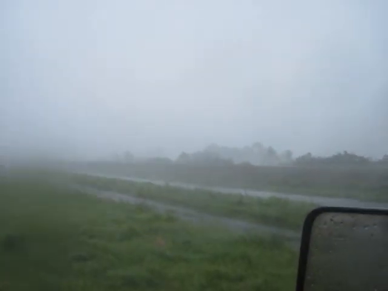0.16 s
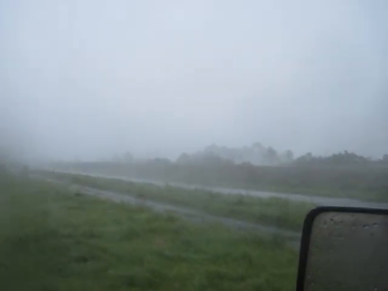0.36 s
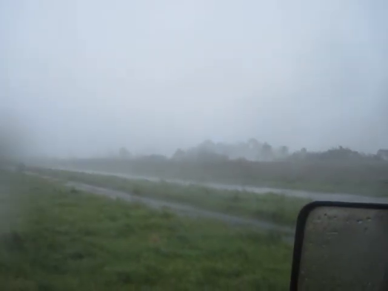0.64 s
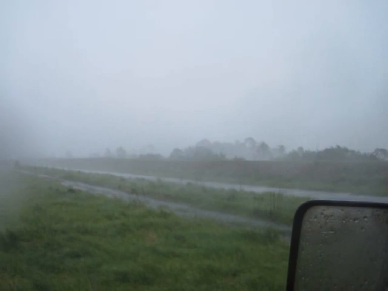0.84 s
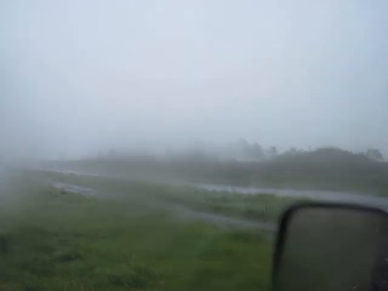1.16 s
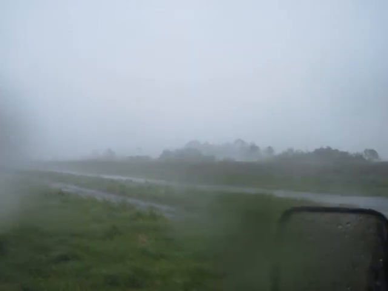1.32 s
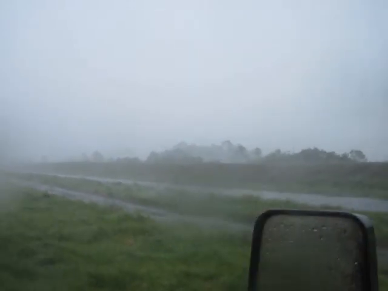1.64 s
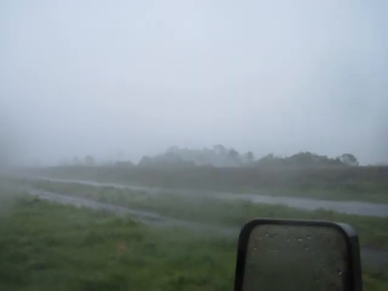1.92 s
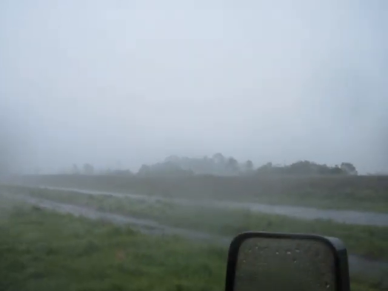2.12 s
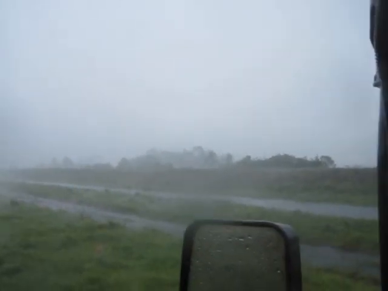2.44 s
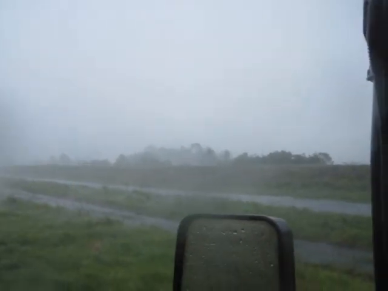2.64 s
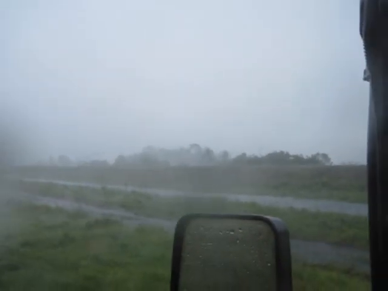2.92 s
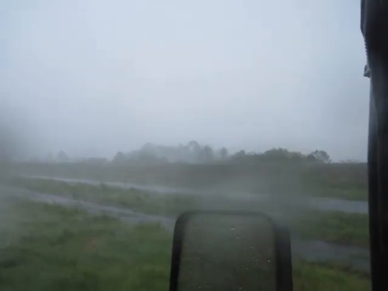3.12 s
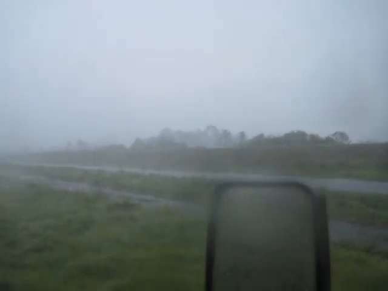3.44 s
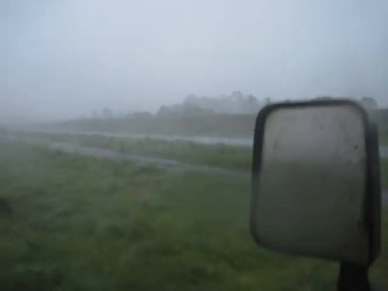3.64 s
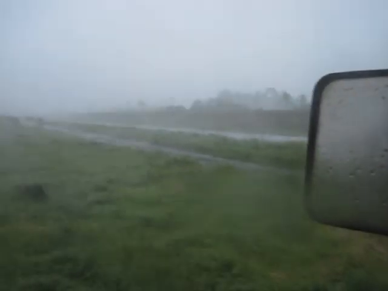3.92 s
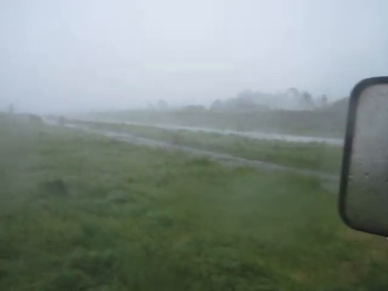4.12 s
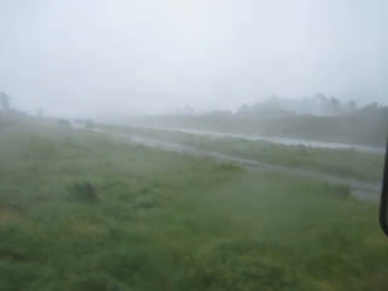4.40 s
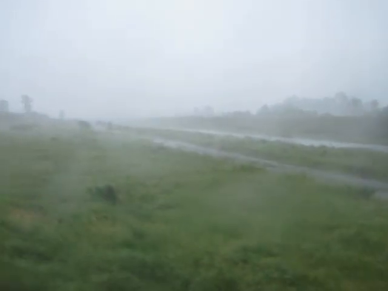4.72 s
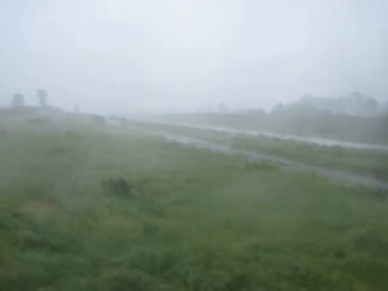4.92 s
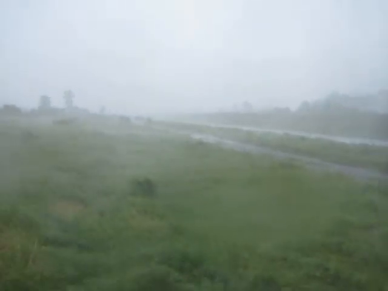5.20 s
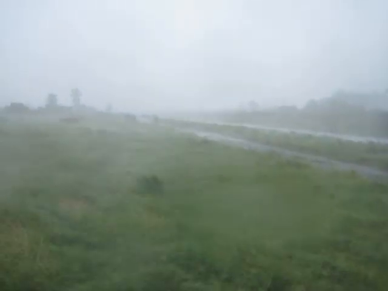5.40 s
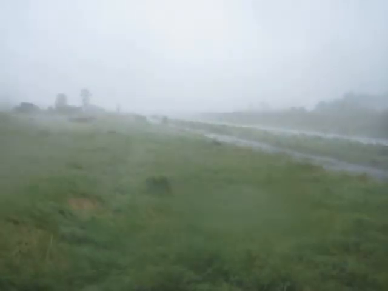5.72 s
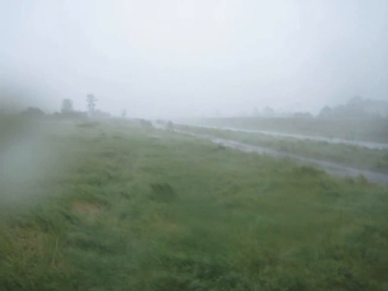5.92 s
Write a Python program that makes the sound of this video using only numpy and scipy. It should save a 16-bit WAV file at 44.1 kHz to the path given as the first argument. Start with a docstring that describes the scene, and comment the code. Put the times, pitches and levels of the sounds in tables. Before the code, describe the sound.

Wind gusts buffet a small camera at a vehicle's open window while raindrops tick sharply on its case and plop over its microphone.

```python
"""Rain drops, blown in through a vehicle's open window, tick on the case of a small camera: noise bursts plus case modes.
Some cap its microphone port and plop: trapped air rings, and the overload makes the gain control duck.
Gusts buffet the port and rush round the window frame: coloured, fluttering noise.
Behind them the downpour hisses as steady noise, and a fine spray crackles as many tiny drops."""
import sys
import numpy as np
from scipy import signal
from scipy.fft import rfft, irfft, next_fast_len
from scipy.io import wavfile
from scipy.ndimage import map_coordinates

SR = 44100
rng = np.random.default_rng(int(sys.argv[2]) if len(sys.argv) > 2 else 0)


def wav_record(signal):
    """Record a signal, one row per channel, as 16-bit PCM in the file named by sys.argv[1]."""
    frames = np.transpose(np.atleast_2d(signal))
    bounded = np.clip(frames, -1, 1)
    # unit amplitude maps onto the largest positive 16-bit level
    quanta = np.round(bounded * 32767).astype(np.int16)
    wavfile.write(sys.argv[1], SR, quanta)


N = 266839

# spectrum of wind rush and sloshing water: [f/Hz, relative level/dB]
RUSH_SPECTRUM = [(100, -14.5), (270, -7), (480, -2), (800, -2.5), (1100, -12), (1600, -21), (2400, -35.5),
                 (6000, -54)]


def amp(db):
    """Gain of a level in dB."""
    return 10 ** (np.asarray(db) / 20)


def unit(x):
    """Each row at rms 1."""
    return x / np.sqrt(np.mean(x ** 2, axis=-1, keepdims=True) + 1e-20)


def gain(points, hz):
    """Gain of (Hz, dB) points joined on a log frequency axis."""
    f, db = np.transpose(points)
    return amp(np.interp(np.log(hz + 1), np.log(f + 1), db))


def curve(rows):
    """One value per sample from (s, value) rows."""
    return np.interp(np.arange(N) / SR, *np.transpose(rows))


def wobble(knots_per_s):
    """Smooth random curve through normally distributed knots."""
    knots = rng.standard_normal(int(N * knots_per_s / SR) + 4)
    return map_coordinates(knots, [np.arange(N) * knots_per_s / SR])


def coloured(x, response):
    """Causal minimum-phase filter with a given gain over frequency, along the last axis."""
    n = x.shape[-1]
    m = 2 * next_fast_len(n)
    log_gain = np.log(np.maximum(response(np.fft.rfftfreq(m, 1 / SR)), 1e-6))
    cepstrum = irfft(log_gain, m)
    # folding the cepstrum makes the phase minimal
    cepstrum[..., 1:m // 2] *= 2
    cepstrum[..., m // 2 + 1:] = 0
    return irfft(rfft(x, m) * np.exp(rfft(cepstrum)), m)[..., :n]


def noise(spectrum, swell_db):
    """Noise of rms 1 that swells by swell_db before it takes its colour."""
    swelling = rng.standard_normal(N) * amp(swell_db)
    return unit(coloured(swelling, lambda hz: gain(spectrum, hz)))


def placed(times_s, sounds):
    """Each row of sounds laid down at its time."""
    start = np.round(np.abs(times_s) * SR).astype(int)[:, None]
    at = start + np.arange(sounds.shape[1])
    return np.bincount(at.ravel(), sounds.ravel(), N)[:N]


def puffs(spectrum, swell_db, patch_hz=400, depth_db=3):
    """Turbulent noise: each eddy also has its own colour, so neighbouring bands flutter apart."""
    x = noise(spectrum, swell_db)
    hz, _, z = signal.stft(x, SR, nperseg=512)
    frames = np.arange(z.shape[1])
    field = rng.standard_normal((int(hz[-1] / patch_hz) + 2, len(frames)))
    grid = np.meshgrid(hz / patch_hz, frames / 2, indexing="ij")
    patches = map_coordinates(field, grid, mode="nearest")
    _, fluttering = signal.istft(z * amp(depth_db * patches), SR, nperseg=512)
    return unit(fluttering[:N])


def wind(dull_hz=1150, bright_db=-13):
    """Gusts add power to steady wind; head-on eddies shake the port, grazing ones rush, brighter when strong."""
    # steady wind between gusts: [t/s, level/dB]
    steady_rows = [(0, -28.5), (1.05, -43), (1.5, -53.5), (1.9, -38), (2.3, -34.5), (2.8, -35.5),
                   (3.25, -19), (3.75, -35), (4.4, -30), (4.85, -28), (5.45, -29), (6.05, -20)]
    # angle of the wind: [t/s, rush round the frame re buffet on the port/dB]
    graze_rows = [(0, 10), (.95, 5.5), (1.6, 10), (2.0, -2.5), (2.42, -2.5), (3.1, 8.5), (4.02, 3),
                  (4.38, -6.5), (5.0, -.5), (6.05, -10)]
    # gusts: [t/s, level/dB]
    gust_rows = [(.068, -19), (.138, -17), (.228, -18), (.276, -19), (.5, -26), (.577, -20), (.64, -27),
                 (.93, -25), (.99, -27), (2.009, -12), (2.06, -18), (2.207, -18), (2.383, -15),
                 (2.409, -13), (2.439, -14), (2.485, -21), (2.588, -15), (2.645, -15), (2.668, -11),
                 (2.856, -17), (2.961, -16), (2.992, -19), (3.045, -12), (3.085, -12), (3.16, -17),
                 (3.208, -9), (3.24, -16), (3.3, -12.5), (3.335, -15), (3.363, -10), (3.394, -17),
                 (3.485, -19), (3.593, -20), (4.008, -20.5), (4.388, -17), (4.52, -18), (4.548, -17),
                 (4.63, -13), (4.98, -20), (5.015, -14), (5.05, -17), (5.175, -16), (5.285, -13),
                 (5.605, -21), (5.652, -20), (5.765, -10), (5.82, -20), (5.905, -17), (5.97, -17)]
    # spectrum of the buffet on the port: [f/Hz, relative level/dB]
    buffet_spectrum = [(15, -6), (75, 1.3), (190, 2), (380, -2), (700, -23.5), (2000, -49)]
    attack_s, hold_end_s, release_tau_s = 0.006, 0.016, 0.0115

    s, db = np.transpose(gust_rows)[:, :, None]
    t = np.arange(SR // 2) / SR
    rise = np.clip(t / attack_s, 0, 1)
    fall = np.exp(-np.maximum(t - hold_end_s, 0) / release_tau_s)
    gusts = amp(db) * rise * fall
    strength = np.sqrt(amp(curve(steady_rows)) ** 2 + placed(s[:, 0], gusts ** 2))

    # both sounds share the same eddies
    eddies_db = 3.5 * np.tanh(1.3 * wobble(85))
    buffet = puffs(buffet_spectrum, eddies_db + 1.5 * wobble(130))
    rush = puffs(RUSH_SPECTRUM, eddies_db + 1.8 * wobble(200))
    dull = signal.sosfiltfilt(signal.butter(2, dull_hz, fs=SR, output="sos"), rush)
    rush = dull + (rush - dull) * np.sqrt(strength / amp(bright_db))
    graze = amp(curve(graze_rows))
    return strength * (buffet + graze * rush) / np.sqrt(1 + graze ** 2)


def downpour():
    """Countless far drops merge into a smooth hiss."""
    # rain on the field: [t/s, level/dB]
    level_rows = [(0, -41.5), (.42, -41), (.6, -34.5), (1.1, -35.5), (1.3, -39.5), (2, -41), (3.6, -49),
                  (4.15, -39.5), (6.05, -46)]
    # spectrum of its hiss: [f/Hz, relative level/dB]
    hiss_spectrum = [(40, -6), (300, -8), (780, 13), (1700, 6.5), (2700, 0), (5100, 3), (7000, -17.5),
                     (9700, -19.5), (15500, -36)]
    flutter_db = .7 * wobble(20)
    return amp(curve(level_rows)) * noise(hiss_spectrum, flutter_db)


def drops(times_s, db, ring_db, attack_tau_s=0.0021, splash_t60_s=0.0023,
          tail_db=-31, tail_t60_s=0.016, treble_db=0):
    """A drop bursts in milliseconds of spatter, coloured by where it lands, and rings the case."""
    # case modes: [nominal f/Hz, nominal level/dB, t60/s]
    case_modes = [(1264, -3.5, 0.028), (1567, 0, 0.016), (1755, -12.5, 0.043), (2586, 1.5, 0.0052),
                  (1120, 3.5, 0.0046)]
    # spectrum of the splash: [f/Hz, relative level/dB]
    splash_spectrum = [(150, -11.5), (900, -10), (2000, -5.8), (3050, -1.2), (3550, 3.5), (3900, -1),
                       (4350, 5.5), (5200, 3.5), (7000, -16), (9700, -16), (12500, -20.5), (15500, -29)]
    count, t = len(times_s), np.arange(SR // 48) / SR

    life_s = splash_t60_s * np.exp(.3 * rng.standard_normal((count, 1)))
    decay = amp(-60 * t / life_s) + amp(tail_db - 60 * t / tail_t60_s)
    shape = (1 - np.exp(-t / attack_tau_s)) * decay
    # each landing spot favours other frequencies
    spot = rng.uniform(0, 2 * np.pi, (count, 2))

    def splash_gain(hz):
        """Common spectrum, spot ripple, and treble tilt in dB per 10 kHz."""
        ripple_db = 2.2 * (np.sin(hz / 380 + spot[:, :1]) + np.sin(hz / 1100 + spot[:, 1:]))
        return gain(splash_spectrum, hz) * amp(ripple_db) * amp(treble_db * hz / 10000)

    splash = unit(coloured(shape * rng.standard_normal(shape.shape), splash_gain))

    ring = 0
    for hz, level_db, t60_s in case_modes:
        pitch_hz = hz * (1 + .03 * rng.standard_normal((count, 1)))
        weight = rng.choice([-1, 1], (count, 1)) * amp(3 * rng.standard_normal((count, 1)))
        ring = ring + weight * amp(level_db - 60 * t / t60_s) * np.sin(2 * np.pi * pitch_hz * t)
    return placed(times_s, amp(db)[..., None] * (splash + amp(ring_db)[..., None] * unit(ring)))


def spray(count=750, db=-11.5, crowding=0.99, scatter_db=5, clump_db=2.5):
    """Fine droplets of mixed sizes crackle in loose clumps, thickest and hardest when the rain is blown in."""
    # fine droplets blown in: [t/s, relative level/dB]
    inflow_rows = [(0, -46), (.17, -46), (.2, -32), (.33, -30), (.4, -56), (1.95, -51), (2.03, -39),
                   (2.17, -40), (2.33, -34.5), (2.8, -37.5), (3.05, -39.5), (3.7, -40.5), (4.15, -45),
                   (4.42, -40), (4.85, -45), (5.3, -36.5), (6.05, -32.5)]
    inflow_db = curve(inflow_rows)
    flow = amp(crowding * inflow_db + clump_db * wobble(22))
    # jittered, evenly spaced shares of the total flow give the arrival times
    share = (np.arange(count) + rng.uniform(-2.5, 2, count)) / count % 1
    at = np.searchsorted(np.cumsum(flow) / flow.sum(), share).clip(0, N - 1)
    size_db = scatter_db * np.minimum(rng.exponential(size=count), 2.1)
    return drops(at / SR, inflow_db[at] + size_db + db, ring_db=-11.5,
                 splash_t60_s=0.0016, tail_db=-37, treble_db=2.5)


def big_drops(brighter_per_db=0.22, ordinary_db=-23, glancing_db=-17):
    """Heavy drops strike the case: harder hits splash brighter, glancing ones barely ring it."""
    # drops on the case: [t/s, splash level/dB, case ring re splash/dB (square hits only)]
    ticks = [(.0266, -23.5, -8), (.045, -24), (.228, -25.5), (.2468, -17.5, -4), (.2567, -19),
             (.287, -24, -7), (.295, -25), (.308, -22), (.3175, -20), (.3333, -25), (.389, -21),
             (.426, -30, -3), (.541, -28.5), (.8503, -25.5, -9), (.876, -29), (1.1639, -21.5, -6.5),
             (1.2305, -20.5, 4), (1.2443, -25.5, 3), (1.268, -32), (1.2929, -22.5), (1.302, -25.5),
             (1.368, -21, -.5), (1.4307, -22.5, -3.5), (1.4673, -28), (1.507, -18.5, -6), (1.5507, -25.5),
             (1.5573, -20, -3), (1.591, -26, -1), (1.6186, -21, -3), (1.654, -29, 5), (1.6843, -26.5),
             (1.8281, -31.5, -5), (1.9106, -18.5), (2.004, -24), (2.0098, -26), (2.0278, -18.5, -7),
             (2.0388, -25.5), (2.066, -20), (2.13, -14), (2.1417, -28), (2.1749, -32), (2.2191, -23),
             (2.2285, -27), (2.2583, -22), (2.2684, -28), (2.2754, -23, -9), (2.297, -28), (2.305, -27),
             (2.323, -26, -5), (2.3331, -29), (2.351, -25), (2.3553, -24), (2.361, -23), (2.368, -27.5),
             (2.376, -24), (2.418, -23), (2.4733, -24.5), (2.476, -21, -7), (2.5062, -22),
             (2.5518, -16, -6), (2.5615, -25), (2.6587, -20.5), (2.7, -20.5, 1.5), (2.7067, -25),
             (2.734, -20, -7.5), (2.754, -27), (2.773, -18), (2.805, -27), (2.8089, -25), (2.8367, -29),
             (2.8708, -22), (2.8748, -22.5), (2.9901, -27), (3.0171, -21.5), (3.0411, -28),
             (3.0954, -30.5, -4), (3.1484, -26), (3.2082, -20, -4), (3.3515, -22.5, 3.5),
             (3.4183, -18.5, 0), (3.4353, -31, 5), (3.4555, -18.5, -1.5), (3.4786, -28),
             (3.5357, -18.5, -5.5), (3.6103, -19.5, -6), (3.621, -19), (3.6346, -21, -5),
             (3.705, -22.5, .5), (3.7126, -28), (3.7364, -24.5), (3.7571, -26.5, -.5), (3.8068, -22.5, -5),
             (3.813, -20, -6.5), (3.8206, -20.5, -2), (3.886, -23, .5), (3.904, -29), (3.942, -17.5),
             (4.1068, -22.5, -5), (4.1105, -15.5, 2.5), (4.137, -21, 4), (4.2102, -18.5, -2),
             (4.219, -13.5), (4.248, -27), (4.269, -21, -9), (4.314, -28, 2), (4.3596, -22, -9),
             (4.3875, -27), (4.3979, -26), (4.41, -22.5), (4.4151, -20, -6), (4.419, -21), (4.4356, -24),
             (4.445, -27, 4), (4.4978, -26), (4.5206, -20), (4.5859, -16.5), (4.6092, -24),
             (4.655, -10, -3), (4.6888, -11), (4.697, -16.5), (4.7045, -16.5, -6), (4.7236, -26),
             (4.7349, -20, -3), (4.743, -21.5, -5), (4.8386, -13, -4), (4.8884, -29), (4.9112, -22, -2),
             (4.9502, -19.5), (5.0573, -25), (5.0695, -15, -10), (5.0964, -22, -6), (5.1426, -27.5, -7),
             (5.161, -26), (5.19, -20, -8.5), (5.2412, -26), (5.2559, -24), (5.2604, -22, -7.5),
             (5.2816, -24.5, -6), (5.3035, -16, -3), (5.308, -19), (5.3847, -24.5, 4.5), (5.422, -16.5),
             (5.4287, -19), (5.444, -13, .5), (5.4778, -18.5, -8), (5.4844, -27), (5.511, -25.5, 7.5),
             (5.532, -22, 1), (5.5981, -25), (5.6049, -28, 1), (5.6511, -25), (5.6567, -21, -.5),
             (5.663, -23), (5.6703, -22, -4), (5.7613, -19), (5.7788, -14), (5.8393, -29, 4), (5.858, -22),
             (5.8702, -23), (5.9027, -28), (5.9393, -19), (5.961, -21, -.5), (6.0005, -24.5, -6),
             (6.009, -26), (6.0222, -22, .5), (6.0336, -25)]
    s, db, ring_db = np.transpose([(*row, glancing_db)[:3] for row in ticks])
    treble_db = np.clip(brighter_per_db * (db - ordinary_db), -6, 4)
    return drops(s, db, ring_db, treble_db=treble_db[:, None])


def plops(attack_tau_s=0.00072, rise_per_s=2.1, slosh_db=-30, slosh_t60_s=0.026):
    """A drop caps the port: trapped air is pushed and rings with rising pitch, water sloshes and spatters."""
    # drops on the port: [t/s, starting f/Hz, ring level before attack/dB, t60/s, one-sided push re ring/dB]
    port_hits = [(0.3434, 776, 16.5, 0.006, -51), (1.2322, 586, 31.5, 0.0027, -15),
                 (1.3795, 535, 7, 0.017, -48), (1.8589, 232, 17.5, 0.011, -26),
                 (2.0898, 585, 28.5, 0.0032, -28), (2.2466, 543, 13.5, 0.0053, -44),
                 (2.6368, 620, 13.5, 0.0068, -14), (2.8932, 647, 26.5, 0.0041, -18),
                 (3.5125, 610, 9, 0.0069, -30), (3.864, 830, -12.5, 0.056, -21),
                 (4.039, 740, 13, 0.026, -49), (4.138, 670, 34, 0.0022, -33),
                 (4.1684, 660, 42, 0.0025, -29), (4.2806, 780, 13, 0.0024, 0.5),
                 (4.4605, 860, 17, 0.01, -9.5), (4.5729, 500, 55, 0.0028, -10.5),
                 (4.6638, 965, 16, 0.013, -30), (4.769, 458, 39.5, 0.0033, -11),
                 (5.32, 630, 60, 0.0019, -10), (5.329, 720, 34.5, 0.0031, -13),
                 (5.534, 494, 2.5, 0.012, -7.5), (5.7171, 384, 39.5, 0.0029, -31)]
    s, hz, db, t60_s, push_db = np.transpose(port_hits)[:, :, None]
    t = np.arange(SR // 20) / SR
    ring = np.sin(2 * np.pi * hz * t * (1 + rise_per_s * t / 2))
    air = amp(db - 60 * t / t60_s) * (ring + amp(push_db))
    water = unit(coloured(rng.standard_normal(air.shape), lambda f: gain(RUSH_SPECTRUM, f)))
    slosh = amp(slosh_db + np.minimum(db, 35) / 2 - 60 * t / slosh_t60_s) * water
    plop = (air + slosh) * (1 - np.exp(-t / attack_tau_s))
    # harder drops spatter louder
    spatter = drops(s[:, 0], db=db[:, 0] / 3 - 36.5, ring_db=8.5)
    return placed(s[:, 0], plop) + spatter


def scene():
    """Wind and rain, far and near, at one microphone."""
    return (wind() + downpour() + spray() + big_drops() + plops())[None]


def ducked(x, depth_db=11, attack_tau_s=0.0067, release_tau_s=0.023, sensitivity=0.043, threshold=0.6):
    """Overload charges the gain control, which turns down fast and recovers slowly."""
    t = np.arange(SR // 2) / SR
    memory = np.exp(-t / release_tau_s) * (1 - np.exp(-t / attack_tau_s)) ** 2
    overload = np.maximum(np.abs(x) - threshold, 0)
    charge = signal.fftconvolve(overload, memory[None], axes=1)[:, :N]
    return x * amp(-depth_db * np.tanh(sensitivity * charge))


def record(dry, ceiling=1.0, notch_hz=6300, notch_half_width_hz=230, notch_db=-25):
    """Gain control, clipping, the camera's narrow treble notch and its band limits."""
    clipped = np.clip(ducked(dry), -ceiling, ceiling)

    def notch_gain(hz):
        """Dip whose depth in dB halves at the half width."""
        return amp(notch_db / (1 + ((hz - notch_hz) / notch_half_width_hz) ** 2))

    notched = coloured(clipped, notch_gain)
    low_cut = signal.butter(1, 12, "high", fs=SR, output="sos")
    high_cut = signal.ellip(10, .1, 90, 16400, fs=SR, output="sos")
    return signal.sosfilt(np.vstack([low_cut, high_cut]), notched)


dry = scene()
out = record(dry)
wav_record(out)
```